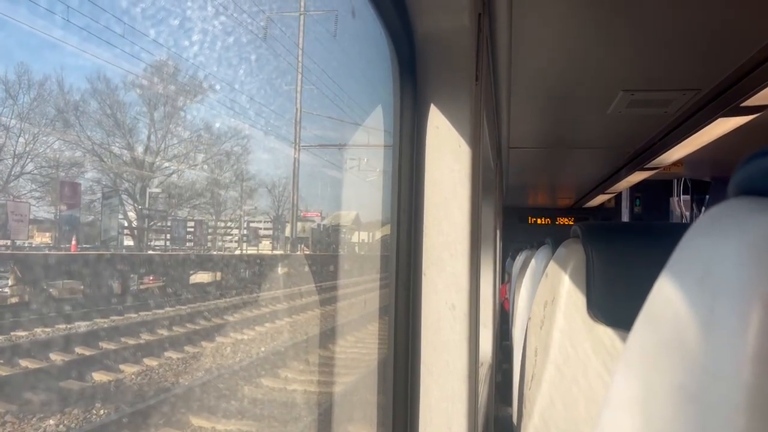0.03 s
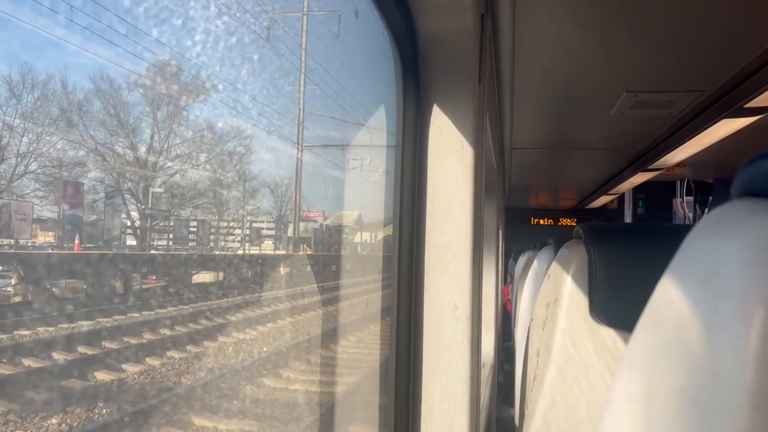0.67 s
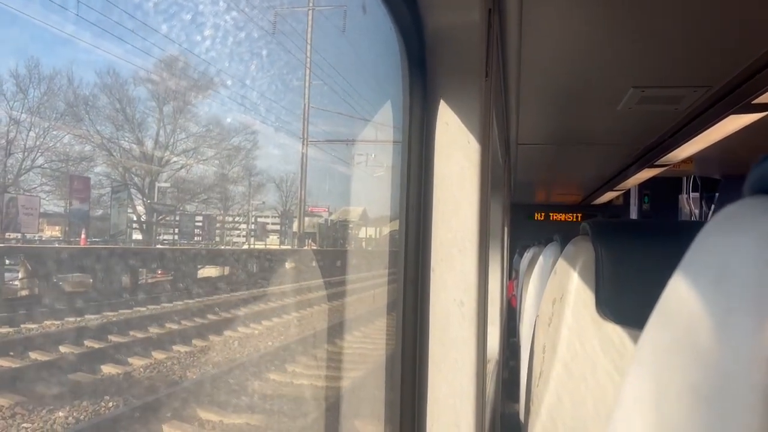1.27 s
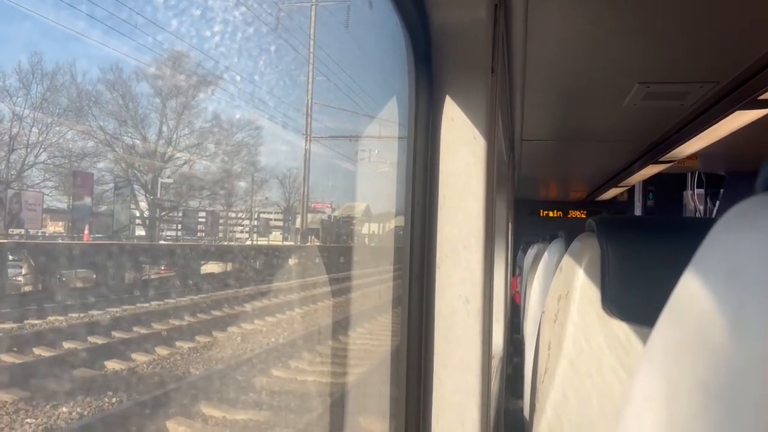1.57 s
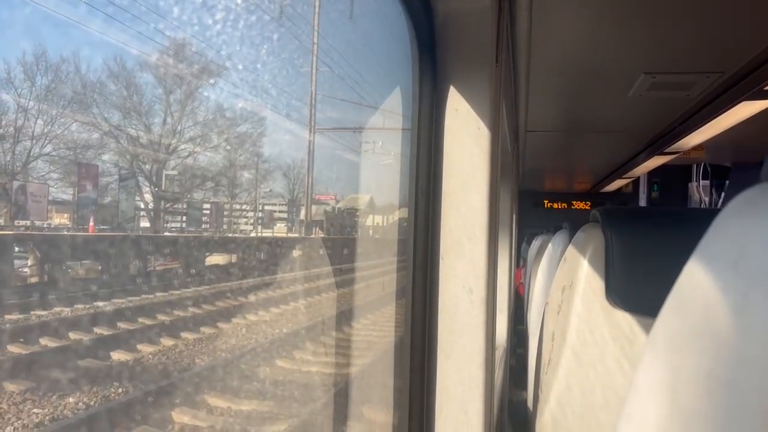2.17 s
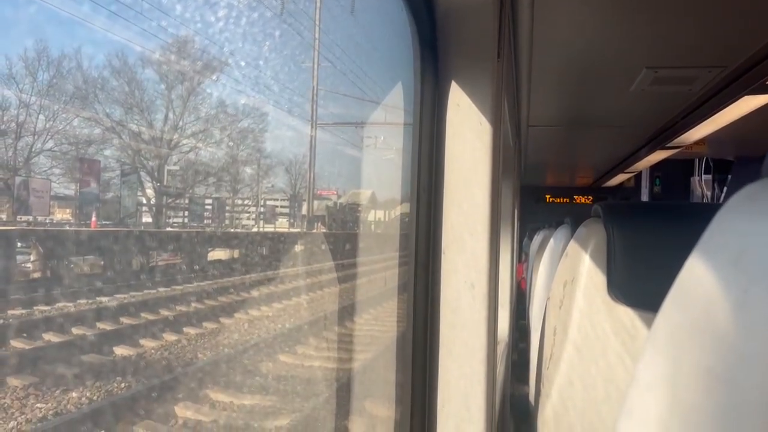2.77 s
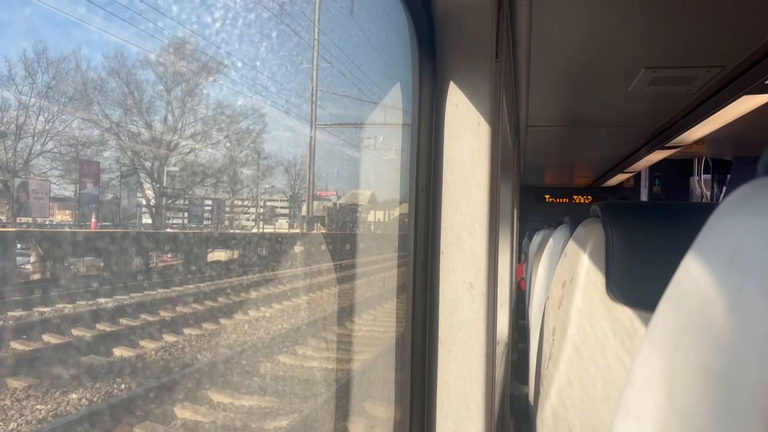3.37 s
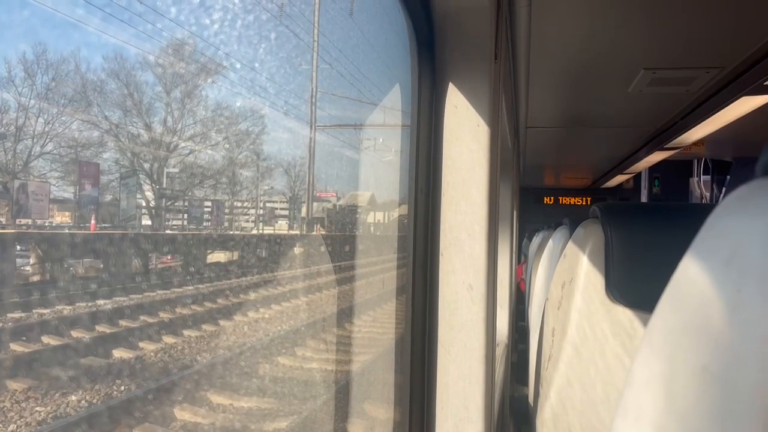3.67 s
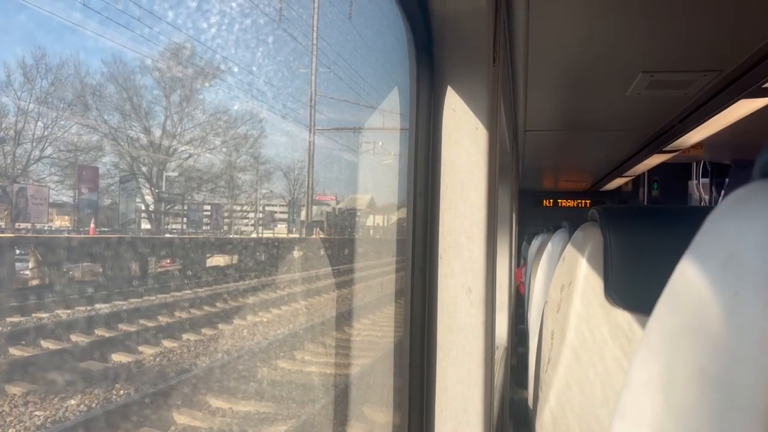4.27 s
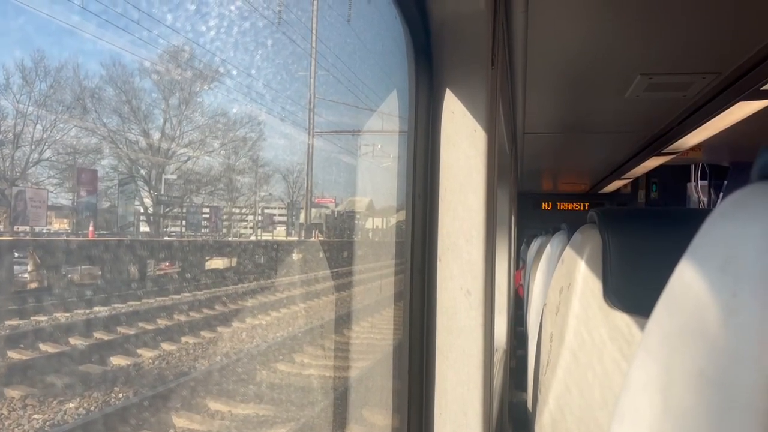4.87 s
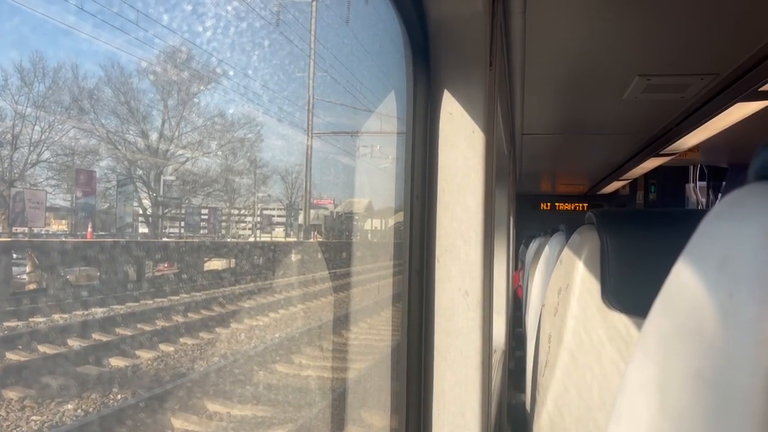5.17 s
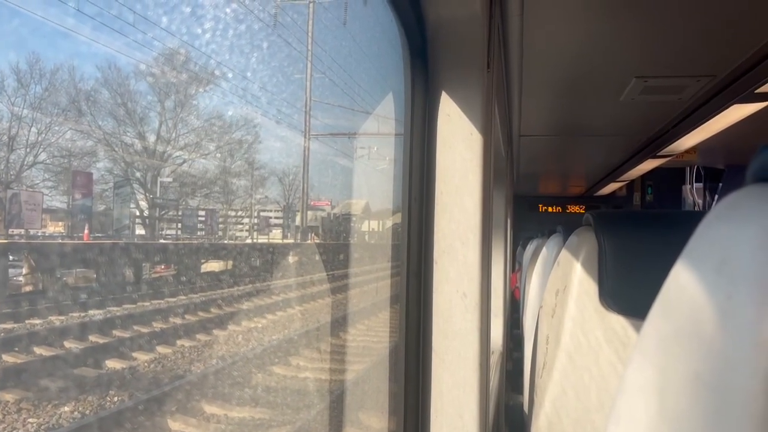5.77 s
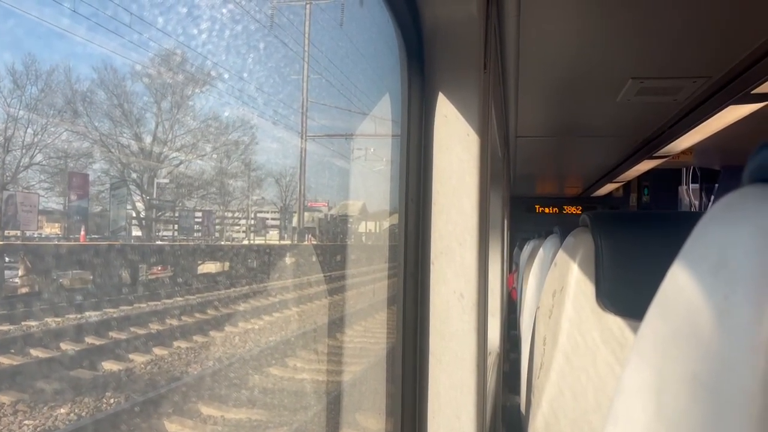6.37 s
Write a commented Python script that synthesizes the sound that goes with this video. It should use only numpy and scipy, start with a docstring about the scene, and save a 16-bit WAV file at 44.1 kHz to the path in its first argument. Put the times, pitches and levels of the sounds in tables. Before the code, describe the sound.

Inside a train coach standing still with its power on, a deep motor hum and a low fan rumble run throughout, with air hissing from the vents, a thin whistle and a faint high electrical whine. Clothes rustle softly now and then. Small panels tap faintly around the middle, cloth scuffs a seat twice, and just before the end something knocks once on the wall. The microphone is at a passenger seat.

```python
"""A deep, steady hum and a rush of air inside a train coach that stands still with its power on.
Motors and a transformer hum through the floor. The fan rumbles, hisses in the vents and whistles
thinly, and the inverter (the electronics that switch the power) whines faintly.
Clothes rustle now and then and twice scuff a seat, small panels tap faintly,
and near the end something knocks once on the wall."""
import sys
import numpy as np
from scipy import signal
from scipy.fft import rfft, irfft, next_fast_len
from scipy.io import wavfile

SR = 44100
rng = np.random.default_rng(int(sys.argv[2]) if len(sys.argv) > 2 else 0)


def unload_wav(signal):
    """Save mono or channel-first audio to the path in sys.argv[1] as 16-bit WAV at rate SR, clipped to [-1, 1]."""
    wavfile.write(
        sys.argv[1],
        SR,
        np.round(np.clip(np.atleast_2d(signal).T, -1, 1) * 32767).astype(np.int16),
    )


N = 283122
T = np.arange(N) / SR
SIZE = next_fast_len(N, real=True)
HZ = np.fft.rfftfreq(SIZE, 1 / SR)


def motor():
    """The main motor's turning shaft hums: louder at first, then settling, with one brief dip."""
    # the overtone at four times the shaft's rate: (time [s], level [dB])
    overtone_levels = [(0, -47), (.6, -49.5), (.93, -46), (1.4, -45), (2.05, -47), (2.42, -44.5),
                       (2.62, -43), (2.82, -42), (3.35, -47.5), (4.4, -46), (4.68, -39.5), (5.05, -50.5),
                       (6.42, -45.5)]
    shaft_hz, steady_db, extra_db, settle_s = 59.25, -29.5, 4.4, 2.2
    dip_db = 3 * swell(3.7, half_s=0.13)
    hum_db = steady_db + extra_db * np.exp(-T / settle_s) - dip_db
    hum = tone(shaft_hz, hum_db, wander_db=1.5, drift_rad=0.029, rate_hz=1.4)
    overtone_db = np.interp(T, *np.transpose(overtone_levels))
    overtone = tone(4 * shaft_hz, overtone_db, wander_db=0.4, drift_rad=0.15, rate_hz=1.6)
    return pan(0.31) * hum + pan(3.5) * overtone


def floor_hum():
    """Other motor shafts and the transformer add quieter low notes through the floor."""
    # the notes: (pitch [Hz], level [dB], left over right [dB], level waver [dB], phase waver [rad])
    notes = [(29.55, -47, 4, 1, 0.16), (76.5, -51, 3, 0, 0.24), (120.5, -39, 2, 0.14, 0.28)]
    return sum(pan(lean) * tone(hz, db, waver, drift, rate_hz=1.54)
               for hz, db, lean, waver, drift in notes)


def blower():
    """Swirling air from the fan makes a low rumble, passed on by the floor and walls."""
    # the rumble from low to high: (frequency [Hz], level before the treble cut [dB per Hz])
    rumble = [(12, -66), (25, -69), (37, -60.5), (46, -55), (60, -55), (80, -58), (98, -58.5), (108, -56),
              (133, -66.6), (170, -64.5), (200, -69), (235, -63.5), (270, -63.5), (305, -66), (370, -71),
              (445, -70.5), (520, -91.5)]
    spectrum = gain_of(read(rumble, HZ)[0]) / (1 + (HZ / 650) ** 8)  # cut above 650 Hz
    return stereo_noise(spectrum) * gain_of(0.65 * wander(3.4))


def vents():
    """Air rushes from the vents, and the ducts ring with the fan's uneven whir."""
    # the rushing air from low to high: (frequency [Hz], level [dB per Hz])
    air = [(400, -78), (700, -81), (950, -85.5), (1600, -82), (1950, -87.5), (2300, -87), (2800, -90.5),
           (4600, -92.5), (5700, -97), (7500, -99), (9000, -107), (11700, -108.5), (13300, -117),
           (15000, -122)]
    # where the ducts and fan ring: (pitch [Hz], width [Hz], relative peak level [dB])
    duct_rings = [(292, 6.9, -63), (330, 18.3, -60), (624, 26, -78), (782, 41, -75.5), (1018, 34, -82.5),
                  (1120, 28, -76.5), (1203, 45, -77.5), (1322, 21, -83.5), (1502, 29, -78.5),
                  (3386, 100, -90.5), (5090, 210, -92), (6830, 50, -89.5)]
    whir_db, flutter_db = 0.5, 1.57
    rush = stereo_noise(gain_of(read(air, HZ)[0])) * gain_of(0.67 * wander(16.0))
    # each ring adds a steep-sided hump of power around its pitch
    ring_power = sum(gain_of(db) ** 2 / (1 + ((HZ - hz) / (0.79 * width)) ** 2) ** 2
                     for hz, width, db in duct_rings)
    whir = stereo_noise(np.sqrt(ring_power)) * gain_of(whir_db + flutter_db * wander(9.0))
    return rush + whir


def knocks():
    """Blunt blows make panels ring: faint, higher, shorter taps on small ones, one knock on the wall."""
    # the blows: (time [s], relative level [dB], pitch [times the wall panel's])
    blows = [(2.614, -44, 3.9), (2.634, -43, 3.87), (2.902, -41, 2.57), (3.322, -46, 2.45), (6.344, -28, 1)]
    # the wall panel's own notes: (pitch [Hz], relative level [dB], time to fade by 60 dB [s])
    panel_notes = [(302, 6, 0.083), (326, -13, 0.076), (695, -24, .03)]
    out = np.zeros(N)
    for start, level_db, pitch in blows:
        t = np.maximum(T - start, 0) * pitch  # a smaller panel does everything faster
        ring = sum(gain_of(db - 60 * t / fade) * np.sin(2 * np.pi * hz * t)
                   for hz, db, fade in panel_notes)
        soft_start = 1 - np.exp(-t / 0.0033)
        out += gain_of(level_db) * ring * soft_start
    return pan(2.0) * out


def scuffs():
    """Cloth slides over a seat: it catches, rubs with a rising rasp under a thin hiss, and lets go."""
    # the slides: (start [s], rise [s], hold [s], fade [s], level [dB],
    #              first pitch [Hz], last pitch [Hz], width [Hz])
    slides = [(4.689, 0.01, 0.037, 0.091, -48, 1300, 1950, 1700),
              (5.595, 0.043, 0.075, 0.033, -52, 2290, 2550, 1300)]
    hiss_hz, hiss_db, flutter_db = 4400, -9.5, 1.0
    out = np.zeros((2, N))
    for start, rise, hold, fade, db, first_hz, last_hz, width in slides:
        t = T - start
        shape = np.clip(t / rise, 0, 1) * np.exp(-np.maximum(t - rise - hold, 0) / fade)
        hz = np.interp(t, [0, rise + hold + fade], [first_hz, last_hz])
        rasp = evened(resonate(stereo_noise(1), hz, width))
        grip = gain_of(db + flutter_db * wander(40.0))
        hiss = gain_of(hiss_db) * friction(hiss_hz)
        out += shape * grip * (rasp + hiss)
    return out


def clothes():
    """Each rustle is a soft swell of fibres rubbing and catching unevenly."""
    # strokes of cloth: (time of the peak [s], length [s], level [dB], middle frequency [Hz])
    strokes = [(.54, .035, -73, 12000), (1.292, 0.025, -47.5, 1080), (3.332, 0.029, -52, 1000),
               (3.375, 0.037, -54, 1250), (3.748, 0.03, -71, 11500), (3.776, 0.067, -51.5, 1220),
               (4.62, .1, -76, 12500), (4.72, 0.03, -48, 850), (5.15, .16, -74, 12000),
               (5.43, .07, -70, 10500), (5.673, 0.09, -70, 11200), (5.845, .03, -53, 700),
               (6.14, .1, -73.5, 11500)]
    out = np.zeros((2, N))
    for peak_s, length, db, hz in strokes:
        grip = gain_of(db + wander(27.92))
        out += swell(peak_s, length / np.sqrt(2)) * grip * friction(hz)
    return out


def whistle():
    """The fan blades sing one thin, unsteady note that drops away and returns about halfway through."""
    # how loud the note is: (time [s], level [dB])
    levels = [(0, -64), (2.8, -65.5), (3.22, -84), (3.38, -55.5), (4.2, -62), (5.3, -64), (5.6, -56.5),
              (5.8, -64), (6.42, -72)]
    db = np.interp(T, *np.transpose(levels))
    return pan(1.4) * tone(1199, db, wander_db=3.5, drift_rad=1.0, rate_hz=10.0, lead_rad=-1.87)


def inverter():
    """Fast electrical switching makes faint, high tones that each flutter and swell once together."""
    # the tones: (pitch [Hz], relative level [dB], left over right [dB], left side's lead [rad])
    switching_tones = [(1684.5, -66.2, 4, .6), (4979, -79.5, 7, .6), (5054, -76.5, 3, 0), (5098, -81, 6, 0),
                       (6739, -81, -4, -1), (6858, -71, 5, -1.4), (6982, -81, -1, -2), (7100, -76, -3, -2),
                       (7219, -75, -1, -1.9), (7342, -79, -1, -2.3), (7703, -80, 0, -2.9),
                       (7821, -77, 0, -3), (7940, -73, 0, -3.1), (8182, -78, 0, -3.1), (8301, -77, 0, -3.1),
                       (8424, -78, 0, -3.1), (8543, -79, 0, -3.1), (9146, -80, 0, 2.4), (9388, -80, 0, 2.2)]
    rest_db, rise_db = -1.2, 2
    whine = sum(pan(lean) * tone(hz, db, wander_db=2.3, drift_rad=0.9, rate_hz=9.0, lead_rad=lead)
                for hz, db, lean, lead in switching_tones)
    return gain_of(rest_db + rise_db * swell(2.9, half_s=1.5)) * whine


def friction(hz):
    """Rubbing fibres hiss in a band around hz; the higher it lies, the fewer octaves it spans."""
    octaves = 0.52 * (hz / 1000) ** -0.28
    band = np.exp(-0.5 * (np.log2((HZ + 1) / hz) / octaves) ** 2)
    return evened(stereo_noise(band))


def stereo_noise(spectrum):
    """Noise with the given strength at each frequency, partly alike in left and right."""
    # how alike the hiss is in left and right, and which side leads:
    # (frequency [Hz], likeness [0-1], left side's lead [rad])
    likeness = [(101, 0.99, 0), (252, 1, 0.33), (432, 0.8, 0), (625, 0.38, 0.78), (975, 0.32, 0),
                (1552, 0.6, -3), (1890, 0.48, .5), (4500, 0.44, 1.04), (5700, 0.34, -2),
                (7030, 0.33, -1.05), (8180, 1, -3), (9100, 1, -2), (10160, 0, -4.5), (10600, 1, -5.5)]
    # which side is louder: (frequency [Hz], left over right [dB])
    balance = [(60, 1), (150, 3.5), (340, 1.5), (530, 6), (760, 1), (870, 0.5), (1050, 3), (1500, -3),
               (1900, 5), (3000, 3.5), (4500, 9), (5800, 6.5), (7600, -1)]
    left, other = rfft(rng.standard_normal((2, SIZE)))
    alike, lead = read(likeness, HZ)
    alike = np.clip(alike, 0, 1)
    right = (alike * left + np.sqrt(1 - alike ** 2) * other) * np.exp(-1j * lead)
    shaped = np.array([left, right]) * pan(read(balance, HZ)[0]) * spectrum
    return irfft(shaped, SIZE)[:, :N] * np.sqrt(SR / 2)


def tone(hz, db, wander_db, drift_rad, rate_hz, lead_rad=0):
    """A pure note, left and right, whose level and phase (its place in the cycle) waver."""
    phase = 2 * np.pi * (hz * T + rng.random()) + drift_rad * wander(rate_hz)
    level = np.sqrt(2) * gain_of(db + wander_db * wander(rate_hz))
    return level * np.sin([phase, phase - lead_rad])


def resonate(x, hz, width):
    """Keeps the part of a sound that lies near the moving pitch hz."""
    turn = np.exp(2j * np.pi * np.cumsum(hz) / SR)
    decay = np.exp(-np.pi * abs(width) / SR)
    # shift that pitch down to zero, smooth twice, then shift it back up
    smoothed = signal.lfilter([(1 - decay) ** 2], [1, -2 * decay, decay ** 2], x / turn)
    return (turn * smoothed).real


def wander(rate_hz):
    """A random curve of typical size 1, made of waves no faster than rate_hz."""
    t = np.linspace(0, T[-1], num=400)
    rates = rate_hz * np.geomspace(1 / 8, 1, num=16)
    waves = sum(np.sin(2 * np.pi * (f * t + rng.random())) / np.sqrt(f) for f in rates)
    return np.interp(T, t, evened(waves - waves.mean()))


def swell(peak_s, half_s):
    """A smooth bump of height 1 around the time peak_s."""
    return np.exp(-((T - peak_s) / half_s) ** 2)


def pan(lean_db):
    """Left and right gains that make the left louder by lean_db and keep the total power."""
    pair = gain_of(np.array([lean_db, -lean_db]) / 2).reshape(2, -1)
    return pair / np.sqrt(np.mean(pair ** 2, axis=0))


def read(points, hz):
    """Fills in a table's columns between its frequencies, with octaves evenly spaced."""
    known_hz, *columns = np.transpose(points)
    return [np.interp(np.log(hz + 1), np.log(known_hz + 1), column) for column in columns]


def gain_of(db):
    """Turns decibels into a number to multiply by."""
    return 10 ** (np.asarray(db) / 20)


def evened(x):
    """Scales a signal so that its typical size (root mean square) is 1."""
    return x / np.sqrt(np.mean(x ** 2) + 1e-20)


def scene():
    """Everything heard from a seat in the coach."""
    steady = motor() + floor_hum() + inverter() + blower() + vents() + whistle()
    return steady + clothes() + scuffs() + knocks()


def record(dry):
    """Cuts away the very highest treble."""
    cutoff_hz = 14450
    treble_cut = signal.firwin(511, cutoff_hz, window=("kaiser", 9), fs=SR)
    return signal.oaconvolve(dry, treble_cut[None], "same")


dry = scene()
out = record(dry)
unload_wav(out)
```